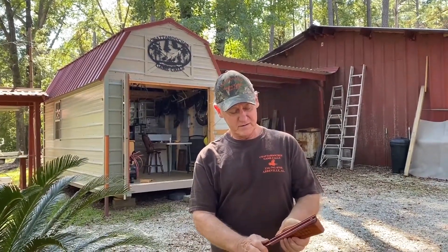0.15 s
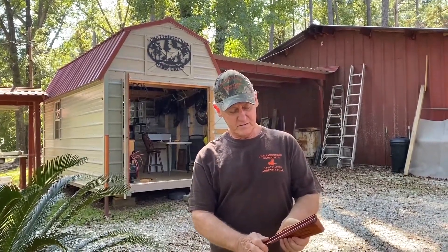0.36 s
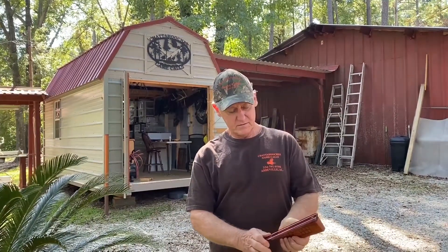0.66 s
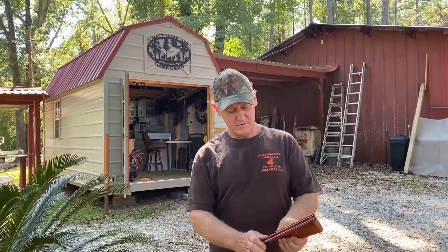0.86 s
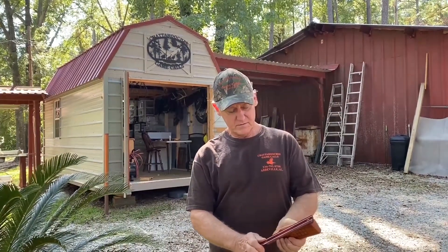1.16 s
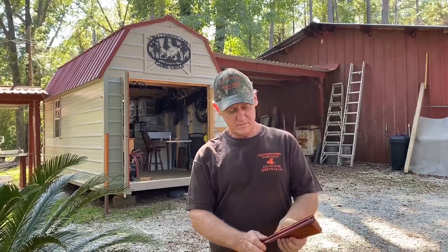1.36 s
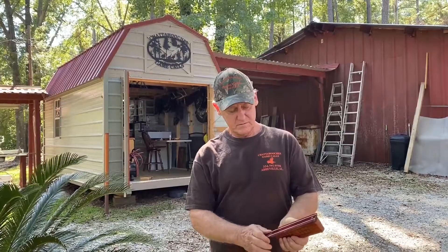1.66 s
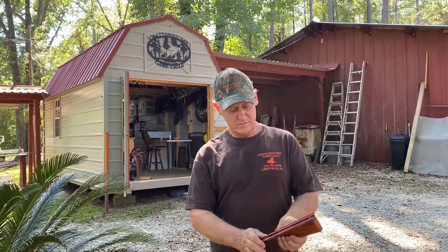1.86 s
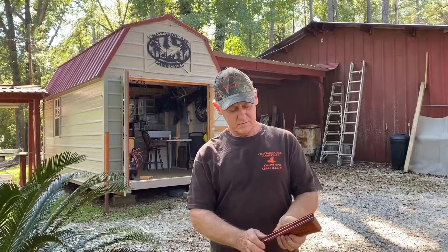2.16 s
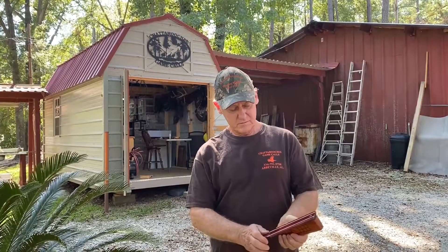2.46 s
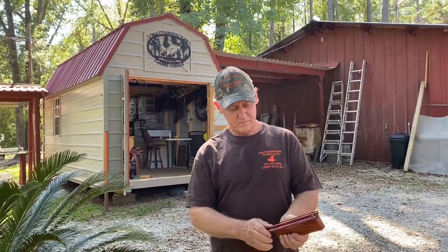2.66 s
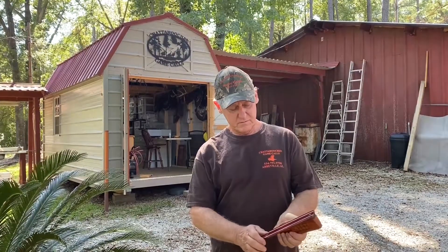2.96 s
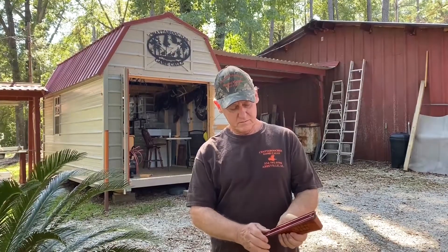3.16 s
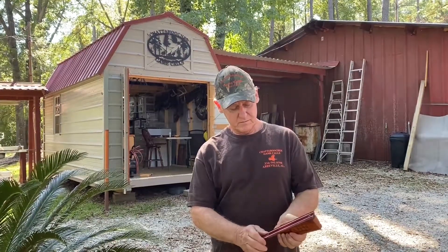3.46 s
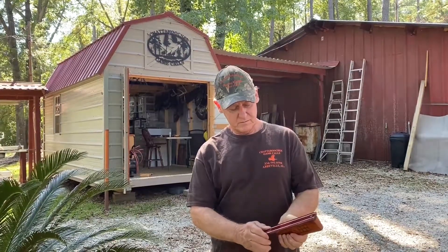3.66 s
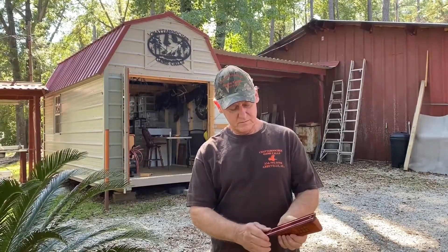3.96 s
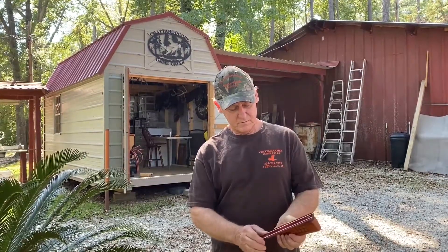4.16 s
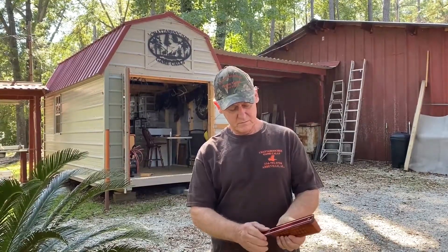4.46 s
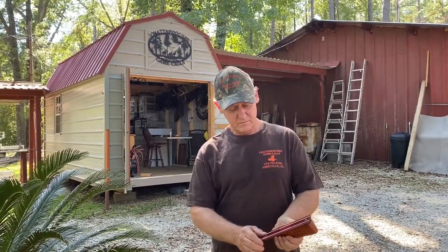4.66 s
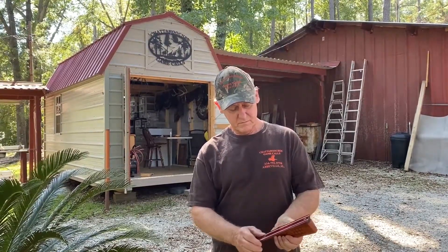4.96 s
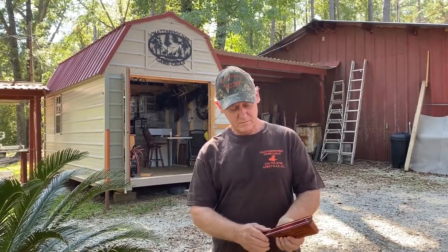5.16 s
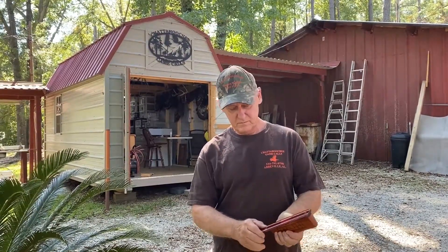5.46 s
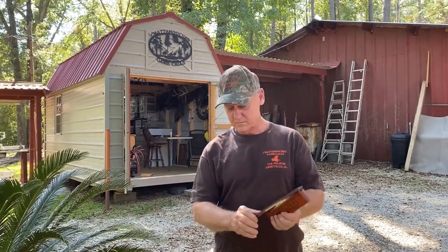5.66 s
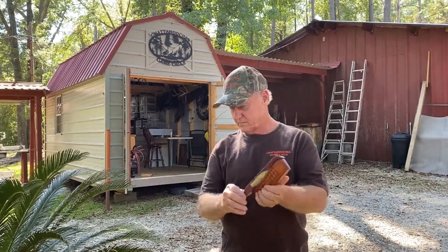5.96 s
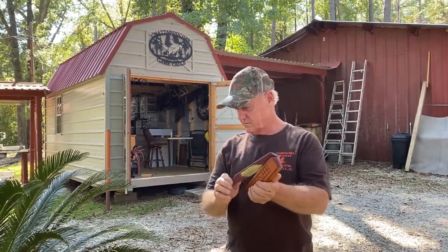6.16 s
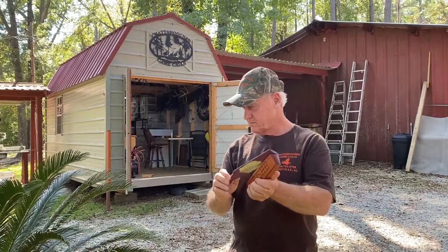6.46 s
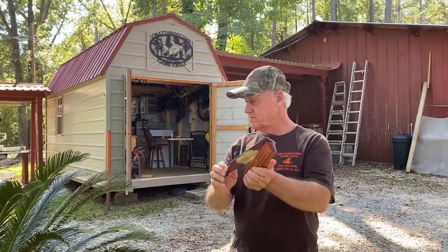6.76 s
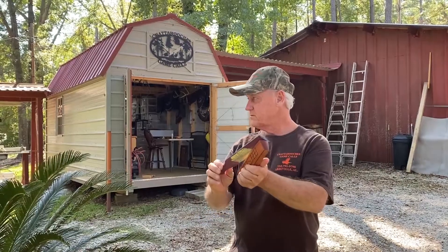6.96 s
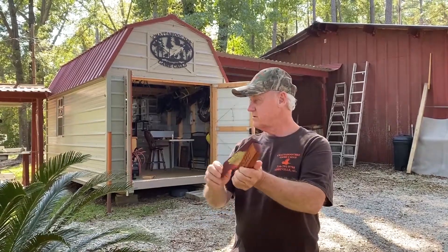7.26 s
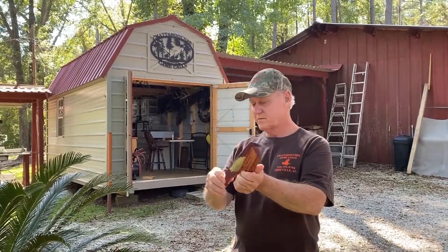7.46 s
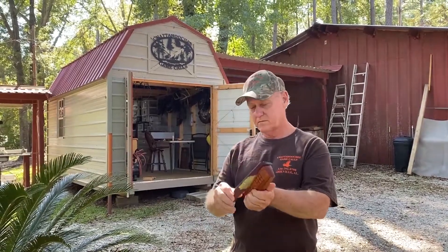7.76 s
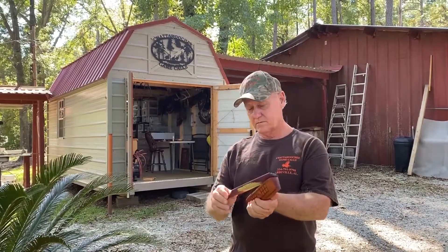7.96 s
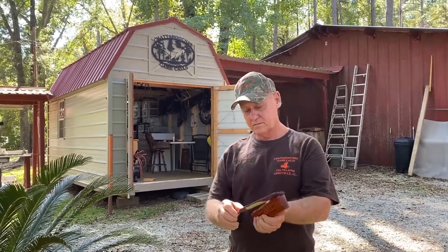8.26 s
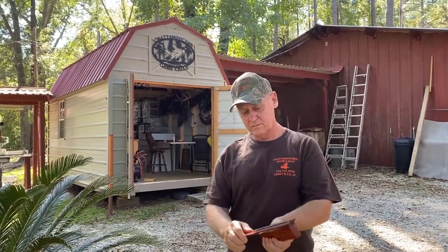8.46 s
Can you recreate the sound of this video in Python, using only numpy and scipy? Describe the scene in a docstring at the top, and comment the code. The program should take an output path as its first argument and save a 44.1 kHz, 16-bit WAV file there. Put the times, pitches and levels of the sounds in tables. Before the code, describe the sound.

Outdoors, a chalked wooden call purrs in three rattling bursts, yelps steadily, then barks seven short raspy notes, with gravel crunches and faint rumble.

```python
"""A faint far rumble, then close at hand a wooden box call in a gravel yard: three stuttering purrs, two of
them ending in a yelp, six yelps, then seven short raspy cuts. The chalked lid sticks and slips about 900 times
a second, each slip kicking the resonant modes of the box. Sheds and trees echo the call in noise tails;
shaped noise makes the gravel underfoot and the rumble. Two close microphone ports hear it in stereo."""
import sys
import numpy as np
from scipy import signal
from scipy.fft import rfft, irfft, next_fast_len
from scipy.io import wavfile
from scipy.ndimage import uniform_filter1d, minimum_filter1d, map_coordinates

SR = 44100
rng = np.random.default_rng(int(sys.argv[2]) if len(sys.argv) > 2 else 0)


def materialize(psi):
    """Save the field psi as 16-bit PCM at rate SR to the path in sys.argv[1].

    A 1-D psi becomes a single channel; in a 2-D psi each row is a channel.
    """
    bounded = np.clip(np.atleast_2d(psi).T, -1, 1)
    quanta = np.round(bounded * 32767).astype(np.int16)
    wavfile.write(sys.argv[1], SR, quanta)


N = 379701
T = np.arange(N) / SR

# Far rumble, tone. Each row: frequency in Hz, relative density in dB per Hz.
RUMBLE_TONE = [(15, -67), (32, -28), (59, 0), (85, -9.5), (120, -7.5), (200, -14.5), (330, -17), (480, -19),
               (650, -27.5), (1000, -22.5), (1500, -29.5), (4000, -38), (8000, -68), (15000, -79)]
# Far rumble, mean course before the random swell. Each row: time in seconds, level in dB.
RUMBLE_LEVEL = [(0, -68), (.6, -61), (1.6, -68.5), (2.8, -70.5), (3.3, -65), (4.1, -71), (4.6, -58.5),
                (5.3, -69), (5.7, -58.5), (6.5, -67), (7.7, -72), (8.6, -69.5)]
# Likeness of the two sides in rumble and thud. Each row: frequency in Hz, correlation from -1 to 1.
SIDE_LIKENESS = [(50, .9), (130, .75), (300, .3), (1000, .3)]

# Purr stutters, the lid grips for a moment. Each row: time in seconds where the swelling stutter is still
# 6 dB below its peak, peak pressure in dB, length between the 6 dB down points in seconds,
# slip rate in Hz before the bend of firm stutters.
PURR_STUTTERS = [(0.2116, -21.8, 0.0093, 894), (0.2411, -32.9, 0.0085, 871), (0.2618, -33.3, 0.0116, 879),
                 (0.2833, -17.9, 0.0095, 901), (0.3102, -16.4, 0.0153, 897), (0.3407, -13.5, 0.0095, 904),
                 (0.3691, -16.0, 0.0094, 898), (0.3992, -16.9, 0.0137, 903), (0.433, -13.3, 0.0119, 908),
                 (0.4799, -13.6, 0.0128, 901), (0.5202, -12.6, 0.0122, 896), (0.5558, -12.6, 0.0141, 907),
                 (0.597, -14.5, 0.009, 900), (1.1355, -25.8, 0.01, 888), (1.1648, -20.6, 0.0118, 892),
                 (1.1928, -16.3, 0.0117, 897), (1.2222, -16.3, 0.0112, 900), (1.2528, -18.7, 0.0103, 894),
                 (1.2858, -20.6, 0.0176, 895), (1.3186, -12.9, 0.0129, 901), (1.3537, -12.0, 0.0134, 903),
                 (1.3907, -13.4, 0.0127, 899), (1.4277, -12.3, 0.0127, 909), (1.4653, -15.2, 0.0132, 903),
                 (1.4953, -13.3, 0.0114, 909), (2.0957, -31.8, 0.0084, 866), (2.1341, -26.8, 0.0163, 879),
                 (2.1699, -21.1, 0.0131, 889), (2.2008, -18.8, 0.0102, 890), (2.2314, -22.8, 0.013, 883),
                 (2.2593, -16.4, 0.0151, 899), (2.2927, -13.2, 0.012, 902), (2.3253, -13.6, 0.0118, 903),
                 (2.3598, -13.3, 0.0151, 909), (2.3943, -12.2, 0.0096, 910), (2.4284, -13.9, 0.0127, 915),
                 (2.4605, -14.5, 0.012, 914), (2.4884, -17.5, 0.0174, 932)]
# Drawn strokes, nine stages each: touch, grip, swell, top, dip, hang, rasp, sag, lift.
# Each stage: time in seconds, slip rate in Hz, pressure in dB.
YELP_STROKES = [
    [(.602, 900.5, -18.5), (.615, 906.8, -19.5), (.625, 915.6, -23), (.637, 896, -23), (.652, 877, -24.5),
     (.664, 873, -30), (.675, 860.9, -39.5), (.685, 829.4, -48), (.7, 749.3, -54)],
    [(1.5, 910, -24), (1.51, 896.4, -19.5), (1.547, 893.2, -21.5), (1.554, 982, -14.5), (1.57, 938, -23.5),
     (1.59, 913.6, -22), (1.603, 776, -19), (1.64, 727.1, -20.5), (1.665, 698, -44.5)],
    [(2.5, 967.8, -27), (2.511, 995.6, -21), (2.52, 958.5, -14.5), (2.535, 1023, -10.5), (2.552, 906, -19),
     (2.566, 836, -15.5), (2.58, 807, -14), (2.598, 773.6, -17.5), (2.612, 722.3, -49.5)],
    [(3.028, 834.8, -56.5), (3.052, 850.7, -23.5), (3.17, 886.3, -18.5), (3.191, 935.2, -16.5),
     (3.202, 899.7, -25.5), (3.222, 870.6, -19), (3.238, 745, -13.5), (3.252, 696, -16),
     (3.265, 699.2, -40.5)],
    [(3.497, 861.5, -58), (3.512, 851.5, -30), (3.548, 863.5, -22), (3.582, 939.2, -9.5),
     (3.598, 905, -21.5), (3.616, 852, -17), (3.634, 732, -12.5), (3.648, 685.4, -20), (3.66, 669.5, -39.5)],
    [(3.89, 888, -55.5), (3.904, 857.7, -23.5), (3.935, 873.9, -18), (3.956, 944, -8.5),
     (3.975, 927.5, -18.5), (3.988, 836, -12.5), (4.012, 809, -8.5), (4.028, 729, -22), (4.042, 725, -39)],
    [(4.275, 869.9, -48.5), (4.3, 876.5, -21.5), (4.318, 890, -12.5), (4.333, 952.5, -8.5),
     (4.345, 906.7, -25.5), (4.358, 835.8, -12), (4.38, 793, -11), (4.393, 754, -20.5),
     (4.402, 754.5, -33.5)],
    [(4.659, 857, -50.5), (4.669, 868, -21), (4.69, 866.3, -18), (4.718, 947.4, -9), (4.734, 885.6, -17),
     (4.75, 803.6, -7), (4.774, 825, -9.5), (4.786, 812, -21.5), (4.8, 757, -32)],
    [(5.05, 839.7, -51), (5.085, 860.2, -25.5), (5.133, 883.5, -11.5), (5.149, 969.6, -9),
     (5.16, 913.5, -20), (5.175, 830, -7), (5.19, 791, -9), (5.208, 803, -12.5), (5.222, 744.7, -39)],
]
# Rasp of each drawn stroke after its dip. Each row: every-second-slip share before the stage weight (0-1),
# roughness added at the hang (0-1), roughness added from the rasp on (0-1).
YELP_RASPS = [(0, 0, .03), (.65, 0, 0), (.6, .06, .2), (.1, .2, .04), (.3, .15, .05), (.6, .12, .19),
              (.55, .14, .2), (.65, .14, .2), (.45, .1, .19)]
# Weight of the every-second-slip share at each of the nine stages: it sets in toward the hang.
RASP_STAGE_WEIGHTS = [0, 0, 0, 0, 0, .2, 1, 1.2, 1.2]
# Lid set back on the wall. Each row: time in seconds, level in dB before a fixed boost and the box.
LID_TICKS = [(2.0283, -31.5), (3.0096, -30), (3.447, -32), (3.8494, -29.5), (4.609, -28.5)]
# Cuts, the lid slapped across the wall. Each row: start in seconds, pressure in dB, hold in seconds,
# fade over the hold in dB, slip rate in Hz, end slip rate in Hz, end roughness (0-1).
CUT_STROKES = [(5.9579, -10, .039, -6.5, 739.8, 794.7, .45), (6.3511, -7.5, .027, -12, 753.3, 749.8, 0.5),
               (7.053, -8, .034, -23, 876.4, 961, .4), (7.208, -7, 0.044, -16, 943, 905.6, .45),
               (7.477, -9.5, 0.035, -6, 992, 904.7, 0.4), (7.775, -6, .046, -20.5, 1061, 763, 0),
               (8.1341, -7, 0.049, -22.5, 1050, 789.5, 0.1)]
# Modes of the box. Each row: frequency in Hz, width in Hz, level in dB, factor on that level whose sign is
# that of the motion; neighbours of like sign leave a dip between them.
BOX_MODES = [(942.5, 38, -18.5, 0.24), (1214.5, 135.3, 1, 0.39), (1506, 91, -5.5, -1.41),
             (1785.5, 209.7, 2.5, -0.65), (2125, 400, -3, 0.77), (2205, 52, -6.5, -1.3),
             (2642, 140, -5, 0.75), (3030, 230, -13, 0.82), (3332, 54, -10, 0.84),
             (3697.5, 105, -6.5, 0.69), (5020, 210, -22.5, -1.4), (5670, 374, -14, 0.58),
             (5740, 270, -39, 0.95), (6680, 700, -46.5, 0.76), (10800, 8700, -37, 0.18),
             (13600, 3400, -38, 0.96)]
# Box to microphone. Each row: frequency in Hz, gain in dB.
MIC_GAIN = [(300, -42.5), (620, -0.5), (780, 3.5), (1000, 1.5), (3000, 1.5), (8000, -3.5), (8600, -12.5),
            (10500, 4), (12000, -20), (13500, -9)]
# Extra gain with the box held up, open side out. Each row: frequency in Hz, gain in dB.
RAISED_GAIN = [(350, 10.5), (650, 1), (900, -2.5), (1250, -6.5), (1450, -2.5), (2000, -2), (2700, -4),
               (3100, 1), (3700, 2), (6000, -0.5), (12000, 1)]
# Direct call, balance of the ports. Each row: frequency in Hz, left minus right in dB.
PORT_LEAN = [(600, -2.5), (1300, -6), (1900, -6), (2700, -5), (4400, -4), (8000, -3), (15000, -2.5)]
# Direct call, phase between the ports. Each row: frequency in Hz, lead of the left in radians.
PORT_LEAD = [(500, .3), (900, .4), (1550, -.5), (3100, .7), (5000, 1.3), (7060, 1.7), (9000, -2),
             (13000, -1.5)]
# The box turns. Each row: time in seconds, added left minus right in dB.
BOX_TURN = [(0, 1.5), (1.5, 1), (3, 3), (5.2, 2.5), (6, 1.5), (8.6, 1.5)]

# Yard tail. Each row: frequency in Hz, late decay time by 60 dB in seconds, relative level in dB.
YARD_DECAY = [(706, 0.42, 8), (1510, 0.93, 4), (2020, 1.07, -9), (2540, 1.2, -1.5), (3850, 0.69, 2),
              (6500, 1.5, 4.5), (8000, 0.96, -1), (14000, 0.62, -6.5)]
# Far shed echoes. Each row: delay in seconds after the yard's first answer, level in dB.
SHED_ECHOES = [(.068, -38), (.135, -40)]

# Gravel scuffs. Each row: time in seconds, crunch in dB, thud in dB, fade of the crunch in dB per second,
# length before the shoe lifts in seconds.
GRAVEL_SCUFFS = [(4.176, -25.5, -49, -28.5, 0.16), (4.41, -47.5, -73.5, -150, 0.12),
                 (4.544, -47.5, -64.5, -61, 0.22), (4.944, -36.5, -65.5, -150, 0.033),
                 (4.985, -31, -56.5, -71.5, 0.14), (5.452, -46.5, -62, -54, 0.18),
                 (5.721, -57, -66.5, -78.5, .09), (5.824, -58, -68.5, -58.5, 0.19)]
# Crunch, tone. Each row: frequency in Hz, relative density in dB per Hz.
CRUNCH_TONE = [(240, -47), (400, -20), (1120, -9), (1540, -2), (3620, -5), (5390, -5), (10900, -27.5),
               (11600, -30), (12100, -40), (12900, -30), (15500, -42.5)]
# Thud of the weight on the shoe. Each row: frequency in Hz, relative density in dB per Hz.
THUD_TONE = [(24, -42), (40, -7.5), (81, -7), (253, -13), (306, -5.5), (700, -11.5), (910, -33.5),
             (1540, -120)]

RISE_SHARE, FIRM_RISE_SHARE = .47, .33  # part of a light and of a firm stutter that swells
RISE_BEND, FALL_BEND = 2.4, 2.7  # steepness exponents of the two flanks
CATCH_HZ, HURRY_HZ = 36, 52  # firm stutters slip faster as they catch and as they let go
BEND_FROM_DB, BEND_FULL_DB = -21, -12.5  # pressures where a stutter starts to count as firm, and fully does
CLEAN = .012  # roughness before the dip
CUT_ROUGH, CUT_HALF = .5, .4  # roughness at the bite; every-second-slip share
RAISED_S = 5.8  # from here the box is held up
BITE_S, SINK_S, LIFT_DB_PER_S = .004, .034, -150  # crunch rise, slower thud rise, fade as the shoe lifts
CEILING, LOOK_S, TOP_HZ = .92, .004, 15900  # limiter level, limiter look in seconds, band limit


def amp(db):
    """Gain of a level in dB."""
    return 10 ** (np.asarray(db) / 20)


def unit(x):
    """The signal at rms 1."""
    return x / np.sqrt(np.mean(x ** 2) + 1e-20)


def along(points, hz):
    """Table values read along a logarithmic frequency axis."""
    table_hz, values = np.transpose(points)
    return np.interp(np.log(hz + 1), np.log(table_hz + 1), values)


def filtered(x, response):
    """The signal times a complex response of frequency."""
    size = next_fast_len(N + SR // 2)
    spectrum = rfft(x, size) * response(np.fft.rfftfreq(size, 1 / SR))
    return irfft(spectrum, size)[..., :N]


def stereo_noise(tone, likeness, white):
    """Toned noise of rms 1: the angle between middle and side sets how alike left and right are."""
    def mid_and_side(hz):
        angle = np.arccos(np.clip(along(likeness, hz), -1, 1)) / 2
        return amp(along(tone, hz)) * [np.cos(angle), np.sin(angle)]

    mid, side = filtered(white, mid_and_side)
    return unit(np.array([mid + side, mid - side]))


def far_rumble():
    """Distant low noise that swells slowly and unevenly, a little to the right."""
    swell = map_coordinates(rng.standard_normal(80), [T * 7])  # seven random points a second
    level_db = np.interp(T, *np.transpose(RUMBLE_LEVEL)) + 2 * swell
    lean_db = [[-1.1], [1.1]]
    return amp(level_db + lean_db) * stereo_noise(RUMBLE_TONE, SIDE_LIKENESS, rng.standard_normal((2, N)))


def purr(rate, press, rough):
    """Short grips of the lid, each swelling and dying; firm ones bend the slip rate."""
    for s, db, length, hz in PURR_STUTTERS:
        firm = np.interp(db, [BEND_FROM_DB, BEND_FULL_DB], [0, 1])
        share = RISE_SHARE + firm * (FIRM_RISE_SHARE - RISE_SHARE)
        near = np.arange(round((s - length) * SR), round((s + 2 * length) * SR))
        t = near / SR - s - share * length  # seconds from the peak
        u = t / length / np.where(t < 0, share, 1 - share)  # -1 and 1 where 6 dB down
        grip = amp(db - 6 * np.abs(u) ** np.where(u < 0, RISE_BEND, FALL_BEND))
        ahead = grip > press[near]  # the stronger of two overlapping grips wins
        on, u = near[ahead], u[ahead]
        press[on] = grip[ahead]
        bend_hz = np.where(u < 0, CATCH_HZ, HURRY_HZ) * np.clip(u, -1.5, 1.6) ** 2 - 12
        rate[on] = hz + firm * bend_hz
        rough[on] = CLEAN + .06 * firm


def yelps(rate, press, half, rough):
    """Drawn strokes whose slips alternate in strength and roughen after the dip."""
    for stages, (two, hang_grit, grit) in zip(YELP_STROKES, YELP_RASPS):
        s, hz, db = np.transpose(stages)
        drawn = amp(np.interp(T, s, db, -200, -200))
        on = drawn > np.maximum(press, 1e-6)
        press[on] = drawn[on]
        rate[on] = np.interp(T[on], s, hz)
        half[on] = two * np.interp(T[on], s, RASP_STAGE_WEIGHTS)
        rough[on] = CLEAN + np.interp(T[on], s[4:7], [0, hang_grit, grit])  # from dip to rasp


def cuts(rate, press, half, rough):
    """Slaps of the lid: a faint drag, a sudden rough bite, then a fade and a steep stop."""
    for s, db, hold, fade_db, hz, end_hz, end_grit in CUT_STROKES:
        on = (T >= s - .015) & (T < s + hold + .012)
        u = (T[on] - s) / hold
        level_db = db + fade_db * np.clip(u, 0, None) ** 1.6 - 90 * np.clip(u - 1, 0, None)
        bite = np.clip(u / .022, 0, 1)
        drag = amp(-36.5 + 37 * np.minimum(u, 0))  # heard ahead of the bite
        press[on] = amp(level_db) * (bite + drag)
        rate[on] = np.interp(u, [0, 1], [hz, end_hz])
        rough[on] = np.interp(u, [0, 1], [CUT_ROUGH, end_grit])
        half[on] = CUT_HALF


def strokes():
    """Slip rate in Hz, pressure, every-second-slip share and roughness of the lid, sample by sample."""
    rate = np.full(N, 900.)
    press, half, rough = np.zeros((3, N))
    purr(rate, press, rough)
    yelps(rate, press, half, rough)
    cuts(rate, press, half, rough)
    return rate, press, np.clip(half, 0, 1), np.clip(rough, 0, .6)


def pulses(times, sizes):
    """Impulses placed between samples by a windowed sinc."""
    at = times[:, None] * SR
    idx = np.floor(at).astype(int) + np.arange(-8, 9)
    kernel = np.sinc(idx - at) * np.cos(np.pi * (idx - at) / 18) ** 2
    return np.bincount(np.clip(idx, 0, N - 1).ravel(), (kernel * sizes[:, None]).ravel(), N)


def slip_kicks(rate, press, half, rough):
    """One kick per slip; rough strokes waver, slip unevenly and add chalk hiss."""
    waver = map_coordinates(rng.standard_normal(N // 200 + 4), [np.arange(N) / 200])
    slips_so_far = np.cumsum(rate * (1 + .1 * rough * waver)) / SR
    count = np.arange(1, int(slips_so_far[-1]))
    times = np.interp(count, slips_so_far, T)
    i = (times * SR).astype(int)
    chance = rng.standard_normal((N // 30, 2))[:len(count)]
    times = times + .12 * rough[i] * chance[:, 0] / rate[i]
    alternation = 1 + half[i] * (-1) ** count
    unevenness = np.clip(1 + .9 * rough[i] * chance[:, 1], 0, 2)
    sizes = press[i] * alternation * unevenness
    kicks = pulses(times, sizes * SR / rate[i] / np.sqrt(2))  # slower slips kick harder
    hiss = press * (amp(-28) + amp(-3) * rough) * rng.standard_normal(N)
    return kicks + hiss


def rounded(kicks, rate):
    """Slow slips of the purrs and yelps lose treble; slapped slips stay sharp."""
    blunt = filtered(kicks, lambda hz: 1 / (1 + 1j * hz / 3500) ** 2)
    sharp = amp(np.clip(6 * (rate - 900) / 100, -14, 0))
    sharp[T >= RAISED_S] = 1
    return blunt + sharp * (kicks - blunt)


def lid_ticks():
    """Soft single kicks as the lid is set back on the wall."""
    s, db = np.transpose(LID_TICKS)
    return filtered(pulses(s, amp(db + 27.5)), lambda hz: 1 / (1 + (hz / 3600) ** 6))


def box(hz):
    """Response of the wooden box: its summed resonant modes, as they reach the microphone."""
    modes = 0
    for mode_hz, width, db, sign in BOX_MODES:
        damping = 1j * hz * width
        modes = modes + sign * amp(db) * damping / (mode_hz ** 2 - hz ** 2 + damping)
    return modes * amp(along(MIC_GAIN, hz))


def box_call():
    """Lid slips and ticks ring the box, which is then held up, open side out, for the cuts."""
    rate, press, half, rough = strokes()
    kicks = rounded(slip_kicks(rate, press, half, rough), rate)
    low = kicks * (T < RAISED_S) + lid_ticks()
    high = kicks * (T >= RAISED_S)
    return filtered(low, box) + filtered(high, lambda hz: box(hz) * amp(along(RAISED_GAIN, hz)))


def at_ports(wood):
    """The close call at two microphone ports, with lean and lag by frequency and a slow turn of the box."""
    sides = np.array([[.5], [-.5]])

    def port_response(hz):
        return amp(sides * along(PORT_LEAN, hz)) * np.exp(1j * sides * along(PORT_LEAD, hz))

    return filtered(wood, port_response) * amp(sides * np.interp(T, *np.transpose(BOX_TURN)))


def yard(x, wet_db):
    """Near walls answer first and die fast; trees scatter a long tail, each frequency dying at its own speed."""
    hz, t, noise = signal.stft(rng.standard_normal((2, SR)), SR, nperseg=256)
    table_hz, t60, tone_db = np.transpose(YARD_DECAY)
    start_db = np.interp(hz, table_hz, tone_db)[:, None]
    life = np.interp(hz, table_hz, t60)[:, None]
    trees = amp(-60 * t / life)
    near_walls = amp(12 - 60 * t / .15)
    tail = signal.istft(noise * amp(start_db) * (trees + near_walls), SR, nperseg=256)[1]
    tail *= amp(wet_db) / np.linalg.norm(tail[0])
    for delay, db in SHED_ECHOES:
        start = round(delay * SR)
        tail[:, start:start + 400] += amp(db) * rng.standard_normal((2, 400)) / 20  # 20 = root of 400
    delayed = np.pad(x, (300, 0))  # the first answer comes 300 samples late
    return signal.fftconvolve(delayed[None], tail, axes=1)[:, :N]


def gravel():
    """Dense grains of uneven size crunch under a shoe, over a dull thud as the weight sinks in."""
    crunch, thud = np.zeros((2, N))
    for s, crunch_db, thud_db, fade_db, length in GRAVEL_SCUFFS:
        t = T - s + BITE_S
        fall_db = fade_db * np.clip(t, 0, length)
        lift_db = LIFT_DB_PER_S * np.clip(t - length, 0, None)
        crunch += np.clip(t / BITE_S, 0, 1) ** 2 * amp(crunch_db + fall_db + lift_db)
        thud += np.clip(t / SINK_S, 0, 1) ** 2 * amp(thud_db + .4 * fall_db + lift_db)
    grain_db = 3.2 * rng.standard_normal(N // 12 + 1).repeat(12)[:N]  # a new size every 12 samples
    grains = rng.standard_normal((2, N)) * amp(grain_db)
    stones = crunch * stereo_noise(CRUNCH_TONE, [(100, .38), (5000, .13)], grains)
    return stones + thud * stereo_noise(THUD_TONE, SIDE_LIKENESS, rng.standard_normal((2, N)))


def scene():
    """The close call and its yard echoes, gravel underfoot, and the rumble far off."""
    rumble = far_rumble()
    wood = box_call()
    return rumble + at_ports(wood) + yard(wood, wet_db=-20) + gravel()


def record(dry):
    """A limiter turns the loudest peaks down; nothing above the band limit passes."""
    look = round(LOOK_S * SR)
    need = np.minimum(1, CEILING / (np.abs(dry).max(axis=0) + 1e-9))
    gain = uniform_filter1d(minimum_filter1d(need, size=2 * look + 1), size=look)
    return filtered(dry * gain, lambda hz: hz < TOP_HZ)


dry = scene()
out = record(dry)
materialize(out)
```